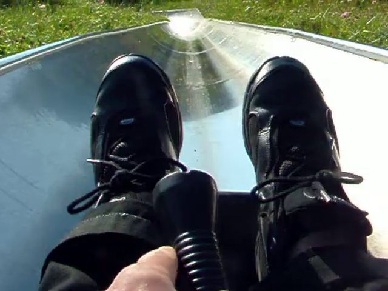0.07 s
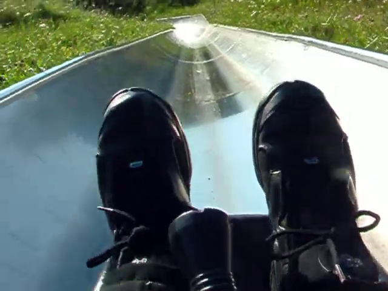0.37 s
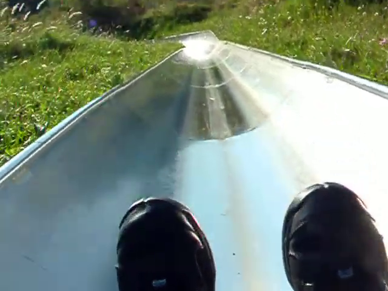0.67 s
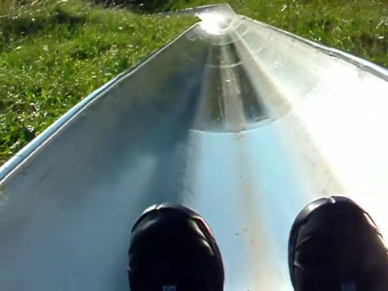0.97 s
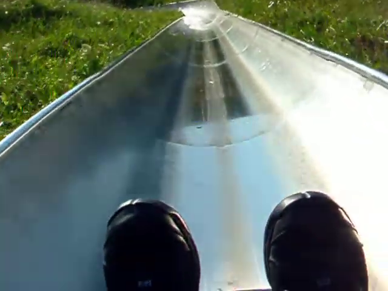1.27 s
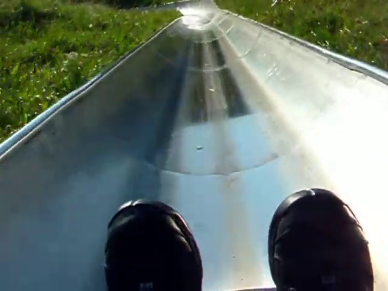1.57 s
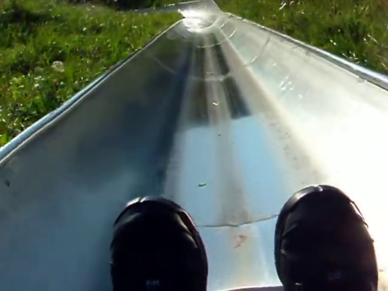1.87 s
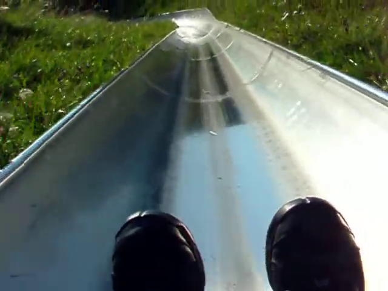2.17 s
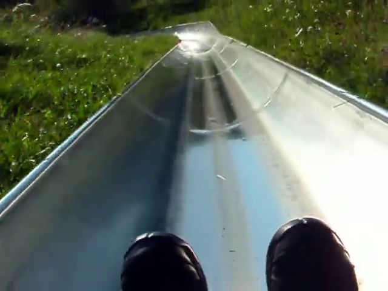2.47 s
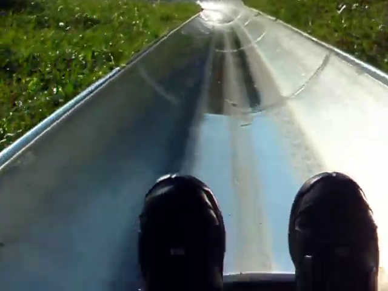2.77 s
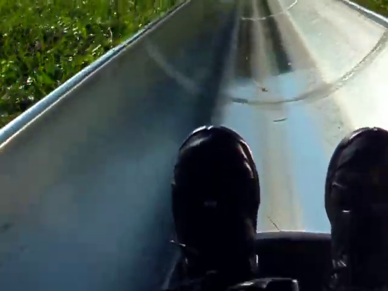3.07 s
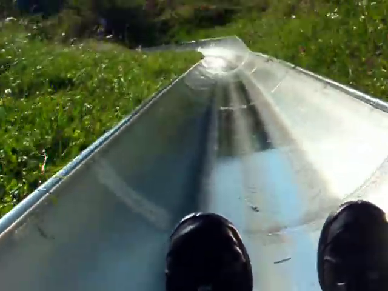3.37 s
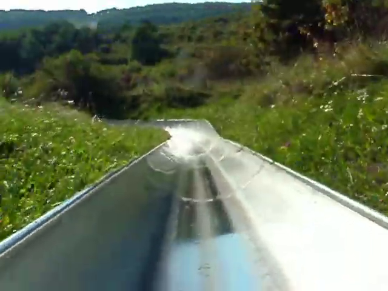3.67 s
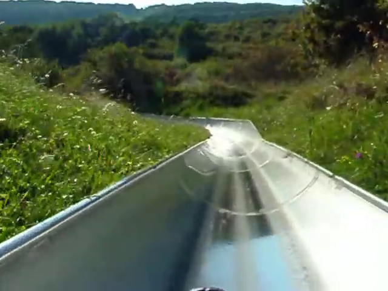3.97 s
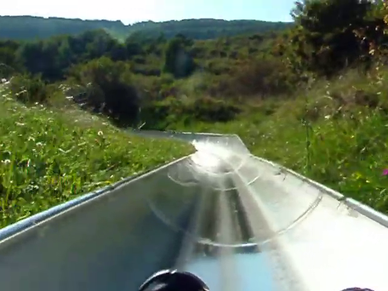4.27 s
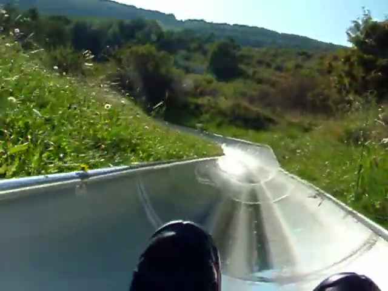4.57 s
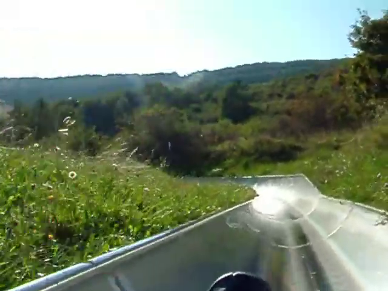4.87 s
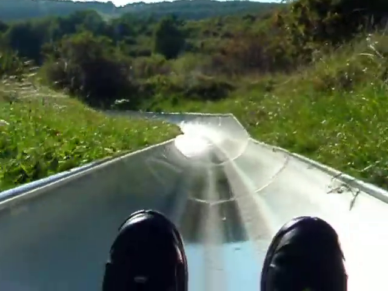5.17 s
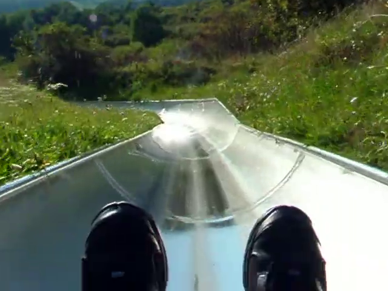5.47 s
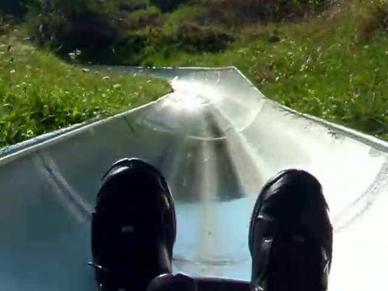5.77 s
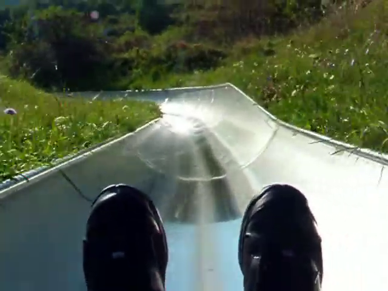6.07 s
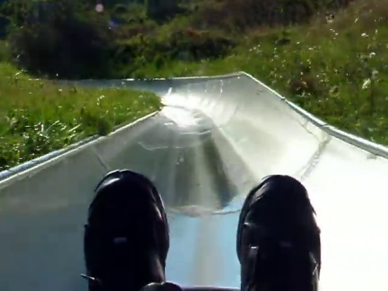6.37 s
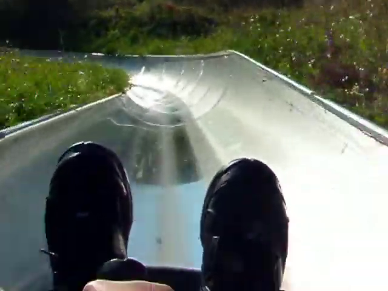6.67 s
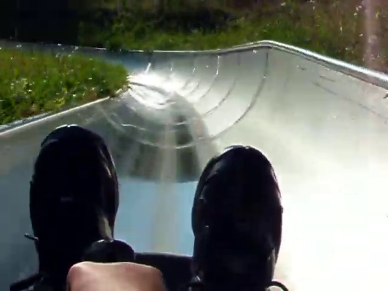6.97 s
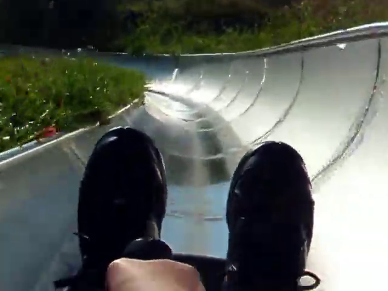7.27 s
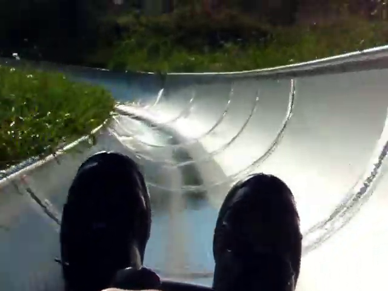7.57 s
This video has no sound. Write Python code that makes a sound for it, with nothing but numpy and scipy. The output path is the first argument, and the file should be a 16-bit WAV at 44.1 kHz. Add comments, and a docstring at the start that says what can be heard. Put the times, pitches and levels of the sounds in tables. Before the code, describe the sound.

A sled rattles and thumps down a steel trough, then rumbles faster as wind buffets the microphone.

```python
"""A sled rolls down a steel trough on a grassy slope, heard from the rider's seat.
At first it jolts over seams: the hollow shell thumps, loose fittings chatter, a steel part rings on.
Grit ticks, plastic clacks, and the runners squeak and skim the wall. As it gathers speed the wheels
rumble, the sheet hisses and wind buffets the microphone, over a camera's faint hiss and whine."""
import sys
import numpy as np
from scipy import signal
from scipy.fft import rfft, irfft
from scipy.io import wavfile

SR = 44100
rng = np.random.default_rng(int(sys.argv[2]) if len(sys.argv) > 2 else 0)


def store_wav(level_fs):
    """Save 16-bit WAV to argv[1]."""
    pcm = np.round(np.clip(np.atleast_2d(level_fs), -1, 1) * 32767)
    wavfile.write(sys.argv[1], SR, pcm.T.astype(np.int16))


N = 344421
TIME = np.arange(N) / SR


def rolling(uneven_db=2.0, gritty_db=1.62, hiss_gain_db=3.0):
    """Wheels on uneven steel sheet: a hollow rumble and a gritty hiss that swell on the same bumps."""
    # level curves of the run: time_s, rumble_db, relative_hiss_db
    run_levels = [(0.25, -54.5, -53), (1.09, -47, -53), (2.12, -34, -45), (2.58, -34.5, -43.5),
                  (2.86, -50.5, -45), (3.11, -58, -50), (3.24, -38, -45), (3.49, -60, -52),
                  (3.95, -59, -49), (4.19, -53, -53), (4.48, -51, -46), (4.96, -44.5, -45),
                  (5.35, -37.5, -43), (5.77, -36.5, -42), (6.14, -32.5, -41), (7.14, -28.5, -37.5),
                  (7.3, -34.5, -35.5), (7.81, -25.5, -35)]
    # the sled's pace: time_s, relative_speed
    sled_pace = [(0, 0.75), (1.5, 0.86), (3.0, 0.92), (5.0, 1.036), (7.81, 0.99)]
    # wheel rumble spectrum: frequency_hz, level_db
    rumble_eq = [(25, -23), (50, -19.5), (85, -5.5), (135, -10.5), (230, 1.5), (310, 3), (450, -6.5),
                 (700, -17), (1200, -17), (3000, -68)]
    # sheet hiss spectrum: frequency_hz, level_db
    hiss_eq = [(200, -3), (500, 3), (900, 0.5), (1100, 2), (1290, -1), (1550, -0.5), (2300, -4.5),
               (3000, -6.5), (4000, -8), (5500, -12.5), (7200, -16), (8500, -33.5)]
    # the sheet singing under the wheels: pitch_hz, width_hz, gain_db
    sheet_modes = [(1283, 33, 1), (2117, 41, -4), (2240, 44, -7), (2480, 13, 2.5), (3410, 230, -9),
                   (3950, 150, -11), (4870, 53, 2)]
    rumble_db, hiss_db = in_time(run_levels)
    speed, = in_time(sled_pace)
    bumps = drift(20)
    # the faster the sled runs over the sheet's ripples, the higher the rumble
    ripples = np.interp(np.cumsum(speed) % N, np.arange(N), colour(noise(), rumble_eq))
    rumble = from_db(rumble_db + uneven_db * bumps) * ripples
    # the hiss opens up fully once the sled is under way
    under_way = np.interp(TIME, [1.0, 3.9, 5.0], [.55, .6, 1])
    hiss_level = under_way * from_db(hiss_db + hiss_gain_db + gritty_db * bumps)
    grit = hiss_level * grains(per_s=9000, spread_db=1.5)
    return rumble + colour(grit, hiss_eq, sheet_modes)


def jolts(top_pitch_hz=501, db_per_octave=64, knock_lag_s=.004, knock_over_db=7):
    """Each seam or bump shakes the sled abruptly and knocks one loose fitting."""
    # seams and bumps: start_s, thump_db, chatter_db, t60_s
    jolt_cues = [(0.072, -41.5, -45, 0.18), (.769, -40, -43, 0.044), (1.653, -26.5, -41.5, 0.34),
                 (2.256, -18, -33, 0.052), (2.267, -12, -37, .08), (2.289, -14, -44.5, 0.14),
                 (2.504, -10, -31, 0.075), (2.52, -10.5, -21, .2), (2.557, -10.5, -21, 0.094),
                 (2.576, -22, -18, 0.21), (2.652, -24.5, -18.5, 0.17), (2.693, -25, -30, 0.21),
                 (2.761, -24.5, -27, 0.099), (3.096, -17, -17.5, 0.18), (3.139, -15, -16, 0.099),
                 (3.199, -25, -19, 0.19), (3.245, -27.5, -33, 0.15), (3.331, -28, -33.5, 0.12),
                 (3.384, -36.5, -50, 0.13), (3.655, -43.5, -39.5, 0.18), (4.067, -31, -25.5, 0.096),
                 (4.086, -27.5, -33.5, 0.24), (4.119, -21, -26.5, 0.11), (4.15, -26, -25, 0.2),
                 (4.178, -29, -25, .12), (4.221, -25.5, -34.5, 0.047), (5.131, -31, -35, .25),
                 (5.197, -42, -25, 0.14), (6.055, -19, -38.5, 0.043), (6.792, -17.5, -27.5, 0.13),
                 (6.825, -32, -26, 0.087), (7.562, -40, -18.5, 0.032), (7.799, -9, -22, 0.023)]
    out = np.zeros(N)
    for s, thump_db, chatter_db, t60 in jolt_cues:
        # a softer contact, with less chatter per thump, sounds lower
        pitch = top_pitch_hz * 2 ** (min(chatter_db - thump_db, 0) / db_per_octave)
        add(out, s, shake(thump_db, chatter_db, rise=0.0025, t60=t60, pitch=pitch))
        add(out, s + knock_lag_s, tick(chatter_db + knock_over_db, hz=1440, t60=0.022))
    return out


def drags(pitch_hz=420, pitch_at_db=-27, db_per_octave=39, chatter_db=-18):
    """The shell groans in a slow, dull swell as it drags on the sheet; a heavier drag sounds lower."""
    # groans of the shell: start_s, level_db, length_s
    drag_cues = [(.17, -34.5, .1), (1.099, -44.5, 0.12), (1.22, -45.5, .2), (1.54, -37.5, 0.11),
                 (1.698, -27.5, 0.19), (1.91, -32.5, .16), (2.186, -20.5, 0.12), (3.985, -32.5, 0.2),
                 (5.167, -33, 0.091)]
    out = np.zeros(N)
    for s, db, length in drag_cues:
        pitch = pitch_hz * 2 ** ((pitch_at_db - db) / db_per_octave)
        add(out, s, shake(db, db + chatter_db, rise=.3 * length, t60=1.5 * length, pitch=pitch))
    return out


def shake(thump_db, chatter_db, rise, t60, pitch, spot_db=9.0, spot_width_hz=45, chatter_lag_s=0.0034):
    """The hollow shell thumps and the fittings chatter: a few hard knocks in a dense run of contacts."""
    # thump spectrum: pitch_ratio, level_db
    thump_eq = [(.15, -33.5), (.3, -15), (.5, -5), (.9, -2), (1.45, -5), (2.4, -12), (3.8, -25), (7.5, -30),
                (20, -61.5)]
    # shell resonances: pitch_hz, width_hz, gain_db
    shell_modes = [(227, 210, -2), (355, 15, -6), (535, 24, -1.5), (590, 7.7, -15), (870, 50, 0.5)]
    # chatter spectrum: frequency_hz, level_db
    chatter_eq = [(200, -13.5), (700, -21), (1500, 2.5), (2200, -1), (3000, -4.5), (4500, 0), (6000, -1),
                  (7300, -1.5), (8200, -13), (9000, -24.5)]
    # resonances of the fittings: pitch_hz, width_hz, gain_db
    fitting_modes = [(1270, 61, -1), (1500, 54, -9.5), (1900, 89, -2), (2950, 30, 9), (3740, 390, 5.5),
                     (4570, 140, -13), (5500, 180, 9.5), (5890, 99, 0), (6450, 310, -3)]
    # every spot of the sheet answers with resonances of its own
    spot_modes = [(hz, spot_width_hz, spot_db) for hz in rng.uniform(900, 7500, size=9)]
    push = swell(thump_db, rise, t60) * grains(per_s=3000, spread_db=4.0, size=SR // 2)
    knocks = from_db(-5.0) * grains(per_s=220, spread_db=0.5, size=SR // 2)
    rattle = grains(per_s=3500, spread_db=6.0, size=SR // 2)
    contacts = swell(chatter_db, rise + chatter_lag_s, t60) * rms_one(knocks + rattle)
    thump = colour(push, [(ratio * pitch, db) for ratio, db in thump_eq], shell_modes)
    return thump + colour(contacts, chatter_eq, fitting_modes + spot_modes)


def ticks(t60_at_1khz_s=0.015, shortening=.35):
    """Grit and small parts tick now and then; the higher ones die sooner."""
    # sharp ticks: start_s, peak_db, pitch_hz
    tick_cues = [(0.7982, -12.5, 1140), (0.822, -23, 1250), (1.761, -29, 5450), (2.582, -7, 1500),
                 (2.955, -16.5, 3200), (3.045, -25, 1790), (3.206, -19, 1570), (4.072, -11, 5500),
                 (4.362, -26.5, 5150), (4.418, -19.5, 990), (4.44, -21, 7300), (4.593, -17, 5360),
                 (4.917, -22, 1750), (6.023, -19.5, 4540)]
    out = np.zeros(N)
    for s, db, hz in tick_cues:
        add(out, s, tick(db, hz, t60_at_1khz_s * (1000 / hz) ** shortening))
    return out


def tick(db, hz, t60, width_share=0.48, crack_db=-17.0, top_hz=7400):
    """A very short crackle, strongest around the pitch of the part that is hit."""
    t = TIME[:2048]
    force = rng.standard_normal(len(t)) * np.exp(-np.log(1000) * t / t60)
    crackle = resonate(force, hz, width_share * hz) + from_db(crack_db) * force
    top_cut = signal.butter(8, top_hz, fs=SR, output="sos")
    return signal.sosfilt(top_cut, from_db(db) * crackle / np.abs(crackle).max())


def struck_parts():
    """Steel sings on after the harder blows; plastic gives a short hollow clack."""
    # blows on a steel part: start_s, level_db
    ring_cues = [(2.266, -33), (2.577, -33.5), (3.143, -34.5), (4.199, -43.5), (5.213, -39.5)]
    # the steel's modes: pitch_hz, level_db, t60_s
    steel_modes = [(2514, -2.5, 0.72), (2620, 0, 0.52), (2860, -3.5, 0.31)]
    # knocks on hard plastic close by: start_s, level_db, brightness_db_per_octave
    clack_cues = [(3.566, -32, -3), (3.570, -26, -0.5), (4.543, -18.5, -2.5), (6.298, -10.5, 0.5)]
    # the plastic's modes: pitch_hz, level_db, t60_s
    plastic_modes = [(1750, -6.5, 0.0055), (2556, -2.5, 0.017), (3130, -2, 0.012), (5110, -0.5, 0.0075),
                     (5830, -2, 0.012), (6530, 2, 0.0065)]
    out = np.zeros(N)
    for s, db in ring_cues:
        add(out, s, from_db(db) * ringing(steel_modes))
    for s, db, tilt in clack_cues:
        tilted = [(hz, db + level + tilt * np.log2(hz / 4000), t60) for hz, level, t60 in plastic_modes]
        add(out, s, ringing(tilted))
    return out


def squeaks(rise_s=0.0063):
    """A runner sticks and slips on the steel, feeding one resonance."""
    # runner squeaks: start_s, level_db, t60_s, pitch_hz, width_hz
    squeak_cues = [(.08, -41, 0.26, 986, 90), (.80, -37.5, 0.17, 990, 400), (1.545, -42, 0.4, 3160, 1200),
                   (1.677, -37, 0.096, 6700, 900), (2.117, -36, 0.054, 2980, 1200),
                   (2.13, -46, 0.19, 5070, 99), (2.255, -30.5, 0.17, 3120, 1200),
                   (2.517, -19, 0.081, 3770, 503), (3.161, -35, 0.23, 2870, 120),
                   (4.145, -25.5, 0.27, 3490, 400), (4.192, -21.5, 0.048, 3390, 400),
                   (5.204, -26.5, 0.069, 5800, 600)]
    out = np.zeros(N)
    for s, db, t60, hz, width in squeak_cues:
        friction = rng.standard_normal(SR // 2)
        tone = resonate(resonate(friction, hz, width), hz, width)
        add(out, s, swell(db, rise_s, t60) * rms_one(tone))
    return out


def wall_skims():
    """A runner skims the wall in smooth swells of bright hiss."""
    # brushes with the wall: centre_s, level_db, half_length_s
    skim_cues = [(5.076, -49, 0.59), (6.47, -39.5, 0.1), (7.0, -48, .55)]
    # skim spectrum: frequency_hz, level_db
    skim_eq = [(1500, -29), (3500, -5.5), (4700, -3), (5800, 0.5), (7000, -9.5), (8500, -39.5)]
    contact = sum(from_db(db) * np.exp(-((TIME - s) / half) ** 2) for s, db, half in skim_cues)
    return colour(contact * noise(), skim_eq)


def wind(lumpy_db=3.5, flutter_gain_db=0.5, lead_s=0.012, slap_front_s=0.00057, slap_decay_s=0.00082,
         deep_offset_db=-3.5, deep_top_db=-39):
    """Turbulence flutters on the microphone and swells into buffets, each with one slapping eddy."""
    # flutter curve: time_s, relative_level_db
    airflow = [(0.25, -69), (2.4, -59), (2.63, -69), (3.79, -81), (5.87, -46.5), (6.04, -37), (6.63, -39.5),
               (6.71, -33.5), (7.16, -32.5), (7.34, -21.5), (7.81, -29.5)]
    # buffets: slap_time_s, slap_db, buffet_db, buffet_t60_s
    buffet_cues = [(6.191, -22, -25.5, 0.43), (6.536, -15, -20.5, 0.13), (6.567, -4, -12, 0.23),
                   (6.638, -15, -10.5, 0.13), (6.799, -8.5, -19, 0.21), (6.895, -12, -16, 0.062),
                   (7.134, 1, -20.5, 0.3), (7.191, 3.5, -17, .15), (7.236, -2.5, -14, 0.037),
                   (7.297, 2.5, -13, 0.13), (7.409, -4, -13.5, 0.18), (7.478, -3, -22.5, .08),
                   (7.558, 4.5, -9, 0.04), (7.635, -8, -17.5, 0.13), (7.737, -22, -12.5, 0.99),
                   (7.799, 3, -11.5, .33)]
    # flutter and buffet spectrum: frequency_hz, level_db
    wind_eq = [(15, -15), (40, -22), (80, 2.5), (130, -4.5), (220, -3.5), (400, -8.5), (700, -23.5),
               (1300, -41), (4000, -70)]
    # spectrum of the deepest eddies: frequency_hz, level_db
    deep_eq = [(15, -3.5), (35, -3.5), (70, -2.5), (120, -19.5), (300, -64)]
    flutter_db, = in_time(airflow)
    power = from_db(flutter_db + flutter_gain_db + lumpy_db * drift(17.0)) ** 2
    slaps = np.zeros(N)
    for s, slap_db, buffet_db, t60 in buffet_cues:
        # the buffet builds just ahead of its slap, an instant's push and pull
        add(power, s - lead_s, swell(buffet_db, rise=0.013, t60=t60) ** 2)
        push_pull = np.tanh((s - TIME) / slap_front_s)
        spike = np.exp(-np.minimum(np.abs(s - TIME) / slap_decay_s, 100))
        slaps += from_db(slap_db) * push_pull * spike
    # the deepest eddies grow with the flutter, up to a ceiling
    deep = from_db(np.minimum(flutter_db + deep_offset_db, deep_top_db)) * colour(noise(), deep_eq)
    turbulence = np.sqrt(power) * grains(per_s=1200, spread_db=3.7)
    return colour(turbulence, wind_eq) + slaps + deep


def camera(hiss_db=-50.5, waver_hz=29.6):
    """A bed of steady hiss with the camera's thin, wavering whine."""
    # whine partials: pitch_hz, wander_hz, level_db
    whine_tones = [(1294, 25, -58.5), (3300, 25, -60.5), (3430, 40, -62), (6800, 1.7, -60.5),
                   (7003, 3.4, -54)]
    # hiss spectrum: frequency_hz, level_db
    hiss_eq = [(15, -49.5), (25, -39.5), (76, -12), (158, -21), (202, -1.5), (272, -30), (356, -11),
               (1100, -20), (1280, -19), (1450, -18), (2810, -20.5), (3420, -20.5), (5190, -19.5),
               (6810, -17.5), (8920, -35.5), (11600, -58), (19600, -120)]
    whine = sum(from_db(db) * np.sin(2 * np.pi * np.cumsum(hz + wander_hz * drift(waver_hz)) / SR)
                for hz, wander_hz, db in whine_tones)
    return from_db(hiss_db) * colour(noise(), hiss_eq) + whine


def from_db(db):
    """Decibels to gain."""
    return 10 ** (np.asarray(db) / 20)


def rms_one(x):
    """Scale to unit power."""
    return x / np.sqrt(np.mean(x ** 2) + 1e-20)


def in_time(rows):
    """Each column of a curve at every sample."""
    s, *columns = np.transpose(rows)
    return [np.interp(TIME, s, c) for c in columns]


def noise():
    """White noise."""
    return rng.standard_normal(N)


def grains(per_s, spread_db, size=N):
    """Random tiny contacts of uneven strength; unit power."""
    sizes = from_db(spread_db * np.minimum(rng.exponential(1, size), 3)) * rng.choice([-1, 1], size)
    return rms_one(sizes * (rng.random(size) < per_s / SR))


def drift(rate):
    """Slow random wander of spread 1."""
    r = np.exp(-80 * np.pi * rate / SR)
    slow = signal.lfilter([1], [1, -2 * r, r * r], rng.standard_normal(N // 40 + 2002))[2000:]
    return np.interp(np.arange(N) / 40, np.arange(len(slow)), rms_one(slow))


def swell(db, rise, t60):
    """Half a second of envelope that builds up and dies away."""
    t = TIME[:SR // 2]
    return from_db(db) * np.minimum(t / rise, 1) * np.exp(-np.log(1000) * np.maximum(t - rise, 0) / t60)


def ringing(modes):
    """One second of a struck part's decaying modes."""
    t = TIME[:SR]
    return sum((-1) ** k * from_db(db) * np.sin(2 * np.pi * hz * t) * np.exp(-np.log(1000) * t / t60)
               for k, (hz, db, t60) in enumerate(modes))


def resonate(x, hz, width):
    """A resonance with gain 1 at its peak."""
    r = np.exp(-np.pi * width / SR)
    feedback = [1, -2 * r * np.cos(2 * np.pi * hz / SR), r * r]
    return signal.lfilter(np.array([1, 0, -1]) * (1 - r * r) / 2, feedback, x + 1e-18)


def response(spectrum, size=4096):
    """Causal impulse response of unit energy with the given spectrum."""
    hz, db = np.transpose(spectrum)
    grid = np.maximum(np.arange(size // 2 + 1) * SR / size, 1)
    cepstrum = irfft(np.log(from_db(np.interp(np.log(grid), np.log(hz), db))))
    h = irfft(np.exp(rfft(2 * cepstrum[:size // 2], size)))
    return h / np.linalg.norm(h)


def colour(x, spectrum, modes=()):
    """Pass a force through a body: a broad spectrum with resonances standing on it; power is kept."""
    h = response(spectrum)
    h = h + sum(from_db(db) * resonate(h, hz, width) for hz, width, db in modes)
    return signal.fftconvolve(x, h / np.linalg.norm(h))[:len(x)]


def add(out, s, sound):
    """Mix a sound in at its time."""
    at = int(s * SR)
    out[at:at + len(sound)] += sound[:max(N - at, 0)]


def scene():
    """Everything is close and dry in the open air, in mono."""
    sled = jolts() + drags() + squeaks() + ticks() + struck_parts() + rolling() + wall_skims()
    return (sled + wind() + camera())[None]


def record(dry, start_s=.071, ceiling=.9, cutoff_hz=9600):
    """The sound opens after a moment of silence, with its peaks rounded and its top cut."""
    rounded = ceiling * np.tanh(dry / ceiling) * (TIME > start_s)
    return signal.sosfilt(signal.cheby2(16, 70, cutoff_hz, fs=SR, output="sos"), rounded)


dry = scene()
out = record(dry)
store_wav(out)
```